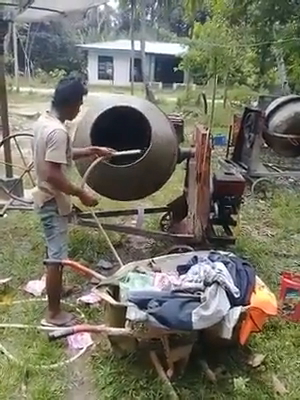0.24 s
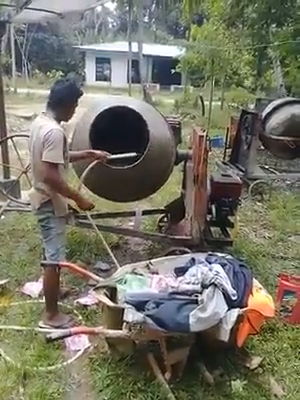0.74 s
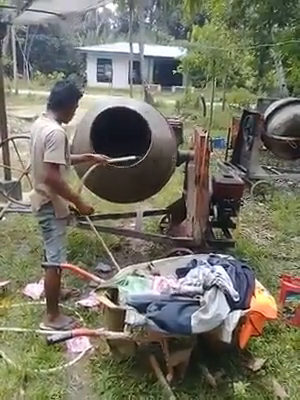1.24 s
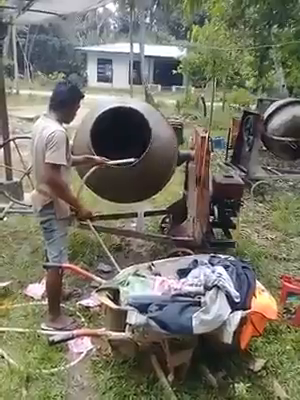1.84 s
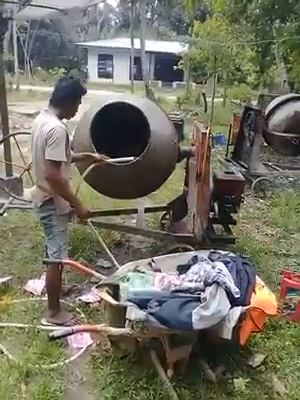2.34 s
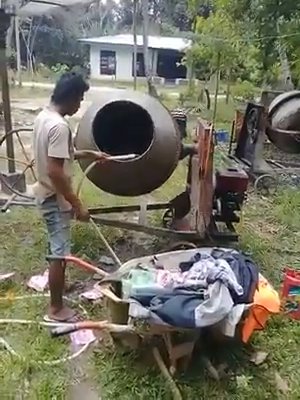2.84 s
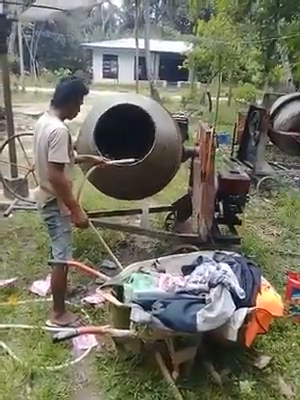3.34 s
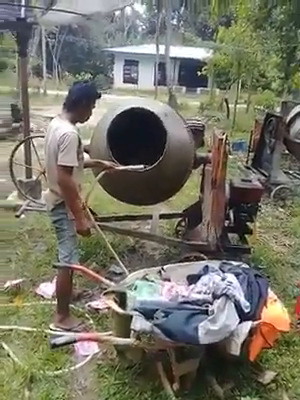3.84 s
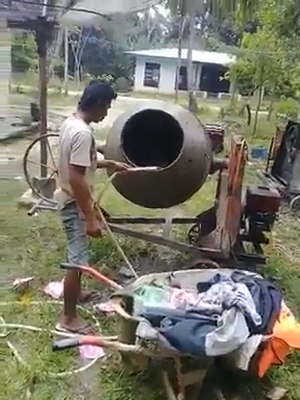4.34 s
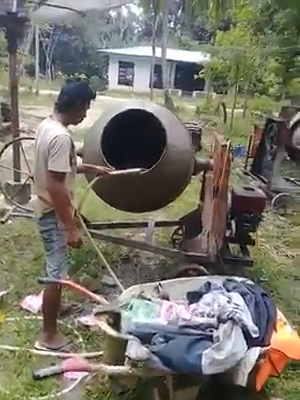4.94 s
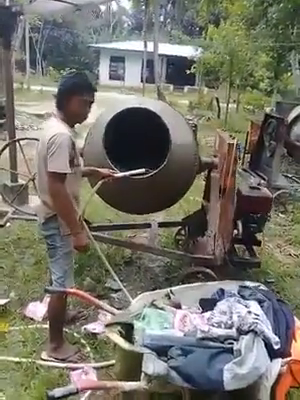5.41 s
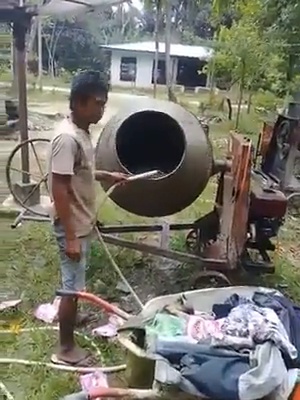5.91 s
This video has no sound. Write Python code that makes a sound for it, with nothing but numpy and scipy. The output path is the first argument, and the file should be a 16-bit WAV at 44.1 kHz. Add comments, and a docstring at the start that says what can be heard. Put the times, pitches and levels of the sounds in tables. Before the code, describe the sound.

A small single-cylinder engine pops in a fast, even idle while a steel drum grinds and rattles, hose spray hisses, and wind thumps the microphone.

```python
"""Engine-driven mixer drum in an open yard

A single-cylinder engine idles and turns a steel drum while a hose sprays into it; the microphone moves round
the pipe mouth. Each firing rings the exhaust pipe as a set of decaying modes, with knocks in between.
Gears and drum are coloured noise, short rings and clacks; spray and exhaust hiss are treble noise puffing
with the beats. Low wind noise and single pressure swings buffet the microphone."""
import sys
import numpy as np
from scipy import signal
from scipy.fft import rfft, irfft, next_fast_len
from scipy.io import wavfile

SR = 44100
rng = np.random.default_rng(int(sys.argv[2]) if len(sys.argv) > 2 else 0)


def decibels_to_gain(level_db):
    """Convert a level in decibels to a linear amplitude gain (20 dB per decade)."""
    exponent = np.asarray(level_db, float) / 20
    return 10 ** exponent


def put_to_file(sound):
    """Save the sound as 16-bit audio at rate SR, in the file named by the first command-line argument."""
    columns = np.atleast_2d(sound).T  # one column per channel
    safe = np.clip(columns, -1, 1)
    whole_steps = np.round(safe * 32767)
    wavfile.write(sys.argv[1], SR, whole_steps.astype(np.int16))


N = 272097   # samples
UPPER_DB = -2   # upper body of the pop at bearing 0


def in_time(rows):
    """Columns of a curve table, joined by straight lines, one value per sample."""
    seconds, *columns = np.transpose(rows)
    return [np.interp(np.arange(N) / SR, seconds, column) for column in columns]


def rms_one(x):
    """Scale to unit rms."""
    return x / np.sqrt(np.mean(x ** 2) + 1e-20)


def soften(x, hz):
    """A fourth-order low-pass rounds sudden edges."""
    return signal.sosfilt(signal.butter(4, hz, fs=SR, output="sos"), x)


def drift(rate_hz):
    """Slow chance of spread 1: noise at every 40th sample through a double one-pole low-pass."""
    r = np.exp(-80 * np.pi * rate_hz / SR)
    slow = signal.lfilter([1], [1, -2 * r, r * r], rng.standard_normal(N // 40 + 2002))[2000:]
    return np.interp(np.arange(N) / 40, np.arange(len(slow)), rms_one(slow))


def clicks_at(seconds, sizes):
    """A click train."""
    at = np.round(np.asarray(seconds) * SR).astype(int)
    inside = (at >= 0) & (at < N)
    return np.bincount(at[inside], sizes[inside], N)


def ring(clicks, hz, t60):
    """A unit click sets a sine of height 1 ringing; it falls by 60 dB in t60 seconds."""
    r, w = decibels_to_gain(-60 / (t60 * SR)), 2 * np.pi * hz / SR
    return signal.lfilter([0, np.sin(w)], [1, -2 * r * np.cos(w), r * r], clicks + 1e-18)


def fading(clicks, fade_ms):
    """Each click jumps up and dies away exponentially."""
    return signal.lfilter([1], [1, -np.exp(-1000 / (fade_ms * SR))], clicks + 1e-18)


def coloured(spectrum, flicker_db, flicker_hz, shared, count=2, peaks=()):
    """Noise of a given spectrum and resonances; count bands an octave flicker partly on their own. Rms 1."""
    size = next_fast_len(N)
    hz = np.maximum(np.arange(size // 2 + 1) * SR / size, 1)
    points, levels = np.transpose(spectrum)
    shape = decibels_to_gain(np.interp(np.log(hz), np.log(points), levels, left=-150, right=-150))
    for centre, width, db in peaks:
        shape = shape * decibels_to_gain(db / (1 + (2 * (hz - centre) / width) ** 2))
    white = rfft(rng.standard_normal(size)) * shape
    together, out = drift(flicker_hz), 0
    bands = np.floor(count * np.log2(hz))
    for band in np.unique(bands[shape > 1e-6]):
        wobble = shared * together + drift(flicker_hz)
        out = out + decibels_to_gain(flicker_db * wobble) * irfft(white * (bands == band), size)[:N]
    return rms_one(out)


def firing_times():
    """Firings in seconds: an even idle, with the governor hunting around the steady speed."""
    # Each row: time in seconds, lateness in ms.
    hunting = [(0, -.3), (.78, -1.5), (1.5, -.65), (2.03, .8), (2.28, .4), (2.78, -1.2), (3.59, -1.5),
               (3.9, -1.2), (4.28, .4), (4.78, 2.9), (5.03, 3.4), (5.52, 3.2), (6.2, 1.2)]
    first_s, firings_per_s = -.0257, 16.0388
    steady = first_s + np.arange(100) / firings_per_s
    return steady + np.interp(steady, *np.transpose(hunting)) / 1000


def mode_groups():
    """Levels in dB of narrow ring, upper body and low knocks; far round, the frame shades ring and knocks."""
    # The listener moves round the pipe mouth. Each row: time in seconds, bearing from 0 to 1.
    listener_path = [(0, 0), (2.0, 0), (3.6, 0.7), (4.4, 0.72), (5.0, 0.8), (5.6, 0.89), (6.17, 0.76)]
    shaded_from, upper_rise_db, narrow_loss_db, low_loss_db = 0.69, 9.5, 15, 7.5
    bearing, = in_time(listener_path)
    shade = np.maximum(bearing - shaded_from, 0) / (1 - shaded_from)
    return -narrow_loss_db * shade, UPPER_DB + upper_rise_db * np.minimum(bearing, 1), 2 - low_loss_db * shade


def engine(firings, narrow_db, upper_db, low_db):
    """Each firing and its pipe-end return ring the pipe; close modes of opposite sign make the pop swell."""
    # Exhaust pipe and silencer modes at equal group levels.
    # Each row: frequency in Hz, level in dB, t60 in seconds, sign.
    pipe_modes = [(172, -33, .048, 1), (301, -49, .1, -1), (374, -50, .1, 1), (573, -33, .041, -1),
                  (664, -31, .021, 1), (710, -40, .063, 1), (888, -35.5, .035, -1), (1061, -39, .07, -1),
                  (1129, -37, .07, 1), (1171, -41, .07, 1), (1316, -30, .075, -1), (1372, -39.5, .053, 1),
                  (1674, -46, .053, -1), (2380, -43, .03, 1), (2610, -42, .03, -1)]
    # Other knocks in every cycle, plus a low frame hum that each cycle rings afresh; levels before the bearing
    # counts. # Each row: delay after the firing in ms, frequency in Hz, level in dB, t60 in seconds.
    cycle_knocks = [(19.96, 420, -39, 0.019), (20.95, 1000, -48, 0.011), (2.62, 985, -44, 0.011),
                    (28.03, 192.5, -52, 0.36), (48.4, 220.4, -39, 0.05), (46.75, 126, -43, 0.11)]
    pipe_end_s, pipe_end_share = .000945, -.71   # the open end sends the pulse back inverted
    body_share = 0.23   # the lower modes share part of the upper body's growth, the lowest most
    out, force_db = np.zeros(N), rng.normal(0, .7, len(firings))
    for hz, db, t60, sign in pipe_modes:
        sizes = sign * decibels_to_gain(db + force_db + rng.normal(0, 0.92, len(firings)))
        blast = clicks_at(firings, sizes) + clicks_at(firings + pipe_end_s, pipe_end_share * sizes)
        if hz < 450:
            angle_db = low_db
        elif hz < 950 or hz > 1500:
            angle_db = 0
        else:
            angle_db = upper_db if hz < 1270 else narrow_db
        growth_db = max(0, 950 - hz) / 950 * body_share * (upper_db - UPPER_DB)
        out += ring(blast * decibels_to_gain(angle_db + growth_db), hz, t60)
    for ms, hz, db, t60 in cycle_knocks:
        knock = clicks_at(firings + ms / 1000, -decibels_to_gain(db + rng.normal(0, 1.2, len(firings))))
        out += ring(knock * decibels_to_gain(low_db), hz, t60)
    return soften(out, hz=2220)   # gas pulses take a fraction of a ms to rise


def puffing(firings, pops):
    """Gains of clatter and hiss, rms 1: a steady part plus uneven bursts at the firing and the valve beats."""
    # Burst powers are relative to the steady part.
    # Each row: delay after the firing in ms, fade in ms, clatter power in dB, hiss power in dB.
    beat_puffs = [(0, 13, 0, 1.5), (34, 3, 2, -6), (36.5, 11, 1, -4), (50, 9, -6, -4)]
    jet_db = 23   # each pressure crest of the pop spits extra hiss
    clatter, hiss = np.ones(N), 1 + (decibels_to_gain(jet_db) * np.maximum(pops, 0)) ** 2
    for ms, fade_ms, clatter_db, hiss_db in beat_puffs:
        beats = clicks_at(firings + ms / 1000, decibels_to_gain(rng.normal(0, 3.0, len(firings))))
        burst = fading(beats, fade_ms)
        clatter = clatter + decibels_to_gain(2 * clatter_db) * burst
        hiss = hiss + decibels_to_gain(2 * hiss_db) * burst
    return rms_one(soften(np.sqrt(clatter), hz=500)), rms_one(soften(np.sqrt(hiss), hz=900))


def rattle(gate):
    """Loose teeth and grit: uneven clicks, denser on the beats, dealt to short rings of 14 pitches. Rms 1."""
    clicks_per_s, ring_cycles = 700, 56
    sizes = decibels_to_gain(1.6 * np.minimum(rng.exponential(1, N), 4)) * rng.choice([-1, 1], N)
    born = rng.random(N) < clicks_per_s * gate ** 2 / SR
    dealt = rng.integers(0, 14, N)
    out = np.zeros(N)
    for k, hz in enumerate(np.geomspace(2050, 3000, 14)):
        out += ring(sizes * born * (dealt == k), hz, ring_cycles / hz)
    return rms_one(out)


def clacks():
    """Each sharper clack of the gears, struck twice 2 ms apart, rings a pair of close shell modes."""
    # Each row: time in seconds, relative strength in dB, upper mode in Hz.
    gear_clacks = [(0.158, -22, 2340), (0.6963, -18, 2370), (1.1593, -27, 2400), (1.1954, -22, 2610),
                   (1.3828, -19, 2620), (1.5718, -24, 2150), (1.6915, -18, 2620), (2.0083, -24, 2200),
                   (2.1301, -35, 2840), (2.7546, -25, 2620), (2.7838, -23, 2380), (2.9104, -15, 2660),
                   (3.4974, -30, 2620), (3.685, -28, 2590), (4.144, -24, 2570), (4.236, -23, 2870),
                   (4.9392, -26, 2630), (5.002, -21, 2500), (5.1595, -21, 2670), (5.5697, -24, 1920)]
    t60, share = 0.035, 0.25
    out = np.zeros(N)
    for s, db, hz in gear_clacks:
        hit = clicks_at([s, s + 0.00201], share * decibels_to_gain(np.array([db - 1.5, db - 10])))
        out += ring(hit, hz, t60) + ring(hit, 0.83 * hz, t60)
    return out


def gears_and_drum(clatter_gate, swell_db):
    """Shell-coloured roar; its upper part, clatter, follows the beats and sways with the tumbling load."""
    # Gears and drum. Each row: frequency in Hz, relative level in dB per Hz.
    roar_colour = [(59, -16), (100, -8.5), (372, -3.5), (444, -10.5), (579, -8.5), (701, -2.5), (999, -10),
                   (1300, -3.5), (1470, -6.5), (1650, -7), (1940, -8), (2690, -5.5), (2950, -6), (3100, -8),
                   (3250, -21), (3400, -54), (4420, -92), (7480, -120)]
    # Drum shell resonances. Each row: centre in Hz, width in Hz, lift in dB.
    shell_peaks = [(1690, 10, 9), (2340, 36, 6.5), (2620, 58, 5.5), (2852, 17, 8.5)]
    # Wet load tumbling against shell and blades; only its swing about the mean counts, scaled below.
    # Each row: time in seconds, level in dB.
    tumbling = [(0.05, -39), (0.57, -38.5), (0.72, -32.5), (0.78, -38), (1.72, -40.5), (1.74, -43.5),
                (1.92, -35.5), (2.16, -41.5), (2.48, -35.5), (2.53, -40.5), (3.19, -37), (3.51, -39),
                (3.65, -35), (3.67, -40), (3.72, -28), (3.77, -42), (3.78, -37.5), (4.65, -40.5),
                (4.77, -33.5), (4.8, -36.5), (4.99, -33.5), (5.43, -39.5), (5.44, -36.5), (5.81, -37.5),
                (6.1, -37.5), (6.12, -40)]
    load_db, = in_time(tumbling)
    load_db = 0.38 * (load_db - load_db.mean())
    noise = coloured(roar_colour, flicker_db=1.16, flicker_hz=20.4, shared=0.21, count=6, peaks=shell_peaks)
    clatter = signal.sosfiltfilt(signal.butter(4, 1450, "high", fs=SR, output="sos"), noise)
    rumble = (noise - clatter) * np.abs(clatter_gate) ** 0.15   # barely follows the beats
    drum = rumble + clatter * clatter_gate * decibels_to_gain(load_db - 0.63)
    short_rings = decibels_to_gain(-46.5 + load_db) * rattle(clatter_gate) + clacks()
    return decibels_to_gain(-35 + swell_db) * drum + soften(short_rings, hz=3120)


def dead_spot(x):
    """A share of a narrow resonance is taken away."""
    centre_hz, width_hz, share = 1445, 130, .6
    return x - share * signal.lfilter(*signal.iirpeak(centre_hz, centre_hz / width_hz, SR), x)


def splash_envelope():
    """Short bursts that die away, for bright spits in the hiss."""
    # Each row: time in seconds, relative strength in dB.
    spits = [(0.2808, -55), (0.405, -53), (0.5322, -54), (0.6594, -53), (1.2141, -58), (1.2855, -57),
             (1.3428, -56), (1.4696, -61), (1.5983, -56), (2.3446, -57), (2.5152, -57), (2.7217, -49),
             (3.0909, -52), (3.2171, -53), (3.3283, -61), (4.2667, -49), (4.6533, -53), (4.779, -51),
             (4.9038, -59), (5.1397, -53), (5.2729, -59), (5.3408, -58), (5.5278, -58), (5.5892, -57),
             (5.6511, -52), (5.7154, -50)]
    seconds, db = np.transpose(spits)
    return soften(fading(clicks_at(seconds, decibels_to_gain(db)), fade_ms=8.1), hz=110)


def spray_and_hiss(hiss_gate, swell_db):
    """Treble noise puffs on the beats, its lower and upper treble changing level; bright spits join it."""
    # Treble colour with gaps and steps. Each row: frequency in Hz, relative level in dB per Hz.
    hiss_colour = [(3150, -21), (3260, -0.5), (3450, -16), (3750, -5.5), (3880, -12), (3950, -50),
                   (4030, 1.5), (4200, 0.5), (4390, 0.5), (4520, -11), (5500, -9.5), (6600, -11.5),
                   (7300, -28), (7950, -23.5), (10400, -31), (11000, -47), (11900, -39.5), (13800, -41.5),
                   (14700, -52), (15200, -56)]
    # Hiss level over time; only the swings about the means count.
    # Each row: time in seconds, lower treble in dB, upper treble in dB.
    treble_levels = [(0.05, -54, -67), (0.27, -54.5, -73), (0.29, -52.5, -62), (0.32, -53.5, -72),
                     (1.37, -53.5, -70.5), (2.01, -55.5, -71), (2.04, -53.5, -68), (2.45, -54, -71),
                     (2.74, -54.5, -68), (2.77, -57, -74), (2.84, -50, -66), (3.01, -55, -77),
                     (3.06, -53.5, -69), (4.24, -54, -69.5), (4.63, -54.5, -71), (4.67, -57, -66),
                     (4.68, -57, -77), (4.72, -54.5, -75), (4.88, -54, -72), (4.92, -52, -66),
                     (5.12, -55, -75), (5.16, -52, -65), (5.31, -54.5, -67), (5.54, -53.5, -71),
                     (6.1, -54, -69), (6.12, -54, -68)]
    lower_db, upper_db = in_time(treble_levels)
    lower_db, upper_db = lower_db - lower_db.mean(), upper_db - upper_db.mean()
    # narrow bands flicker separately
    noise = coloured(hiss_colour, flicker_db=1.9, flicker_hz=12.0, shared=.1, count=12)
    top = signal.sosfiltfilt(signal.butter(4, [7400, 10800], "band", fs=SR, output="sos"), noise)
    top_gain = decibels_to_gain(0.72 * (upper_db - lower_db)) * np.abs(hiss_gate) ** 0.82   # the upper hiss puffs harder
    bright = noise + top * (top_gain - 1)
    splashes = splash_envelope() * (2.2 * top + 0.35 * noise)
    return decibels_to_gain(-48.5 + lower_db + swell_db) * hiss_gate * bright + splashes


def buffets():
    """Gusts hit the microphone: a pressure swing between weaker ones, slowing as it dies away."""
    # Each row: time in seconds, peak in dB, frequency at the peak in Hz, push +1 or pull -1.
    gust_hits = [(0.594, -23, 89.5, -1), (0.609, -23, 73.4, -1), (1.021, -27, 53.7, 1),
                 (1.063, -27, 115, -1), (2.813, -16.5, 98, -1), (3.641, -23, 104, -1),
                 (3.657, -22.5, 65, -1), (3.915, -28.5, 77, -1), (4.164, -23, 75, -1), (4.193, -15, 76, -1),
                 (4.243, -22, 83.5, 1), (4.373, -27, 74.4, -1), (4.551, -32, 57, 1), (4.684, -30, 74.6, 1),
                 (4.963, -25, 49.6, 1), (5.299, -20, 77.4, -1), (5.358, -29, 70, -1), (5.511, -29, 75, -1),
                 (5.543, -26, 90, -1), (5.806, -25.5, 59, -1), (5.907, -30, 66.4, 1),
                 (6.026, -20.5, 61.5, 1)]
    length_cycles, slowing_per_cycle, rise_share = 0.77, 0.13, 0.67
    out, t = np.zeros(N), np.arange(-4000, 6000) / SR
    for s, db, hz, sign in gust_hits:
        turns = hz * t / np.maximum(1 + slowing_per_cycle * hz * t, .5)
        hull = np.exp(-.5 * (turns / length_cycles / np.where(t < 0, rise_share, 1)) ** 2)
        peak = clicks_at([s], np.sign(sign) * decibels_to_gain(np.array([db])))
        out += signal.fftconvolve(peak, hull * np.cos(2 * np.pi * turns))[4000:4000 + N]
    return out


def wind():
    """Low noise of moving air at the microphone, rising and falling."""
    # Each row: time in seconds, level in dB.
    wind_level = [(0.0, -37.5), (0.8, -41.5), (1.9, -41.5), (2.3, -38.5), (3.3, -40.5), (3.65, -36.5),
                  (5.0, -35), (5.5, -42.5), (6.17, -35)]
    # Each row: frequency in Hz, relative level in dB per Hz.
    wind_colour = [(7.1, -36), (12, -1), (40, 10), (68, 11), (134, -5.5), (189, -11.5), (250, -8),
                   (320, -35), (550, -120)]
    level_db, = in_time(wind_level)
    return decibels_to_gain(level_db) * coloured(wind_colour, flicker_db=1.0, flicker_hz=12.0, shared=0.97)


def scene():
    """Engine, drum, spray and wind at one microphone."""
    firings = firing_times()
    pops = engine(firings, *mode_groups())
    clatter_gate, hiss_gate = puffing(firings, pops)
    swell_db = 0.5 * drift(13)   # a small random swell shared by the levels of roar and hiss
    roar = gears_and_drum(clatter_gate, swell_db)
    hiss = spray_and_hiss(hiss_gate, swell_db)
    return (dead_spot(pops + roar) + hiss + wind() + buffets())[None]


def band_limit(x):
    """A steep low-pass at the top of the band."""
    return signal.sosfilt(signal.butter(12, 15138, fs=SR, output="sos"), x)


def record(dry):
    """The microphone's finished mix in its stored form."""
    return band_limit(dry)


dry = scene()
out = record(dry)
put_to_file(out)
```